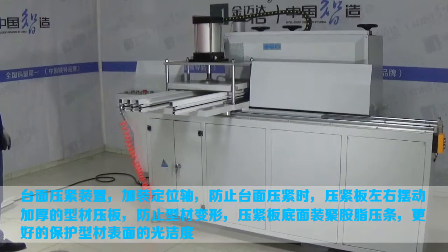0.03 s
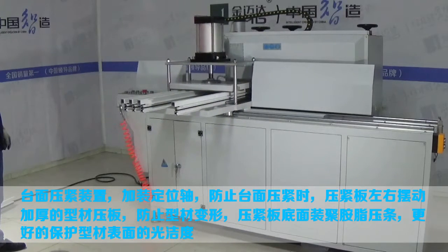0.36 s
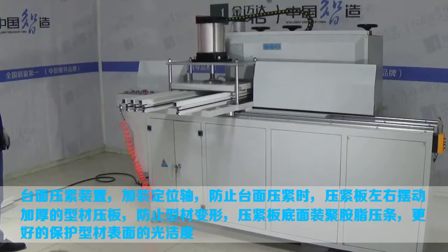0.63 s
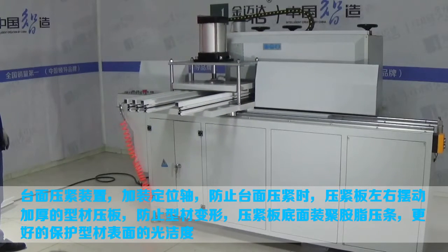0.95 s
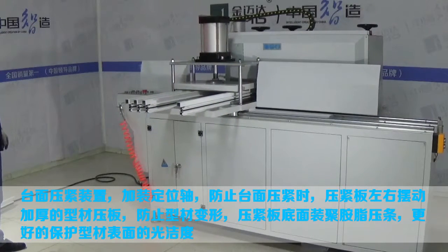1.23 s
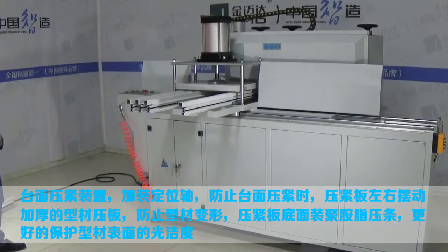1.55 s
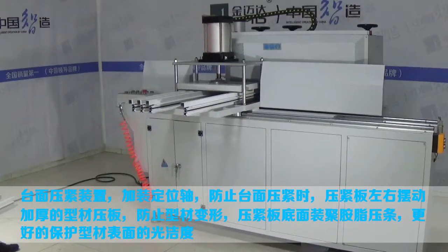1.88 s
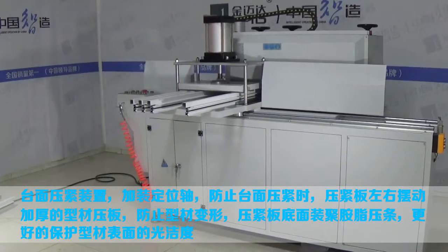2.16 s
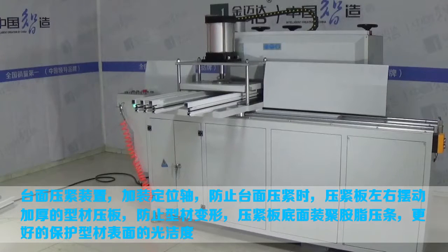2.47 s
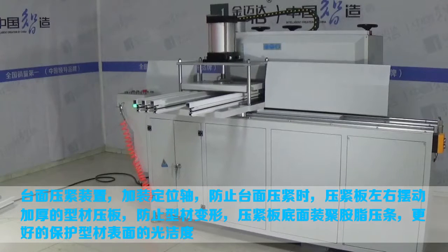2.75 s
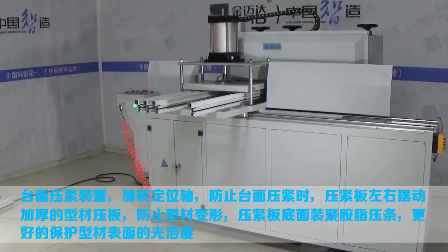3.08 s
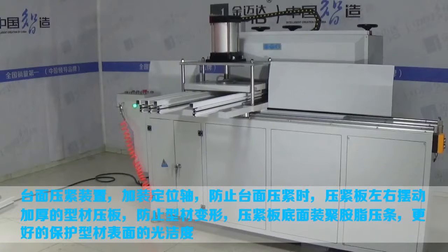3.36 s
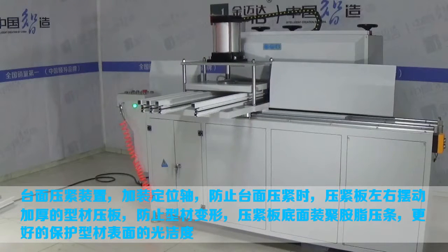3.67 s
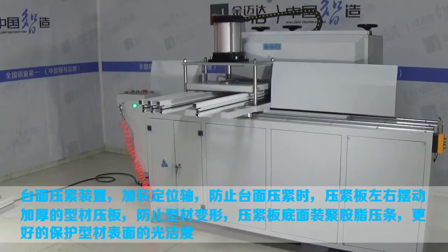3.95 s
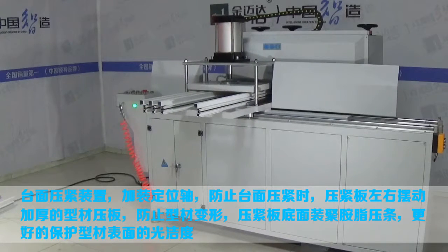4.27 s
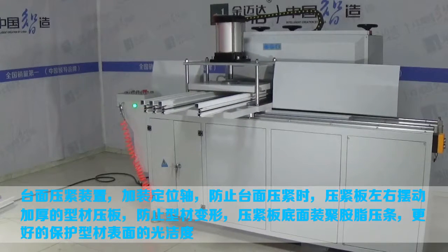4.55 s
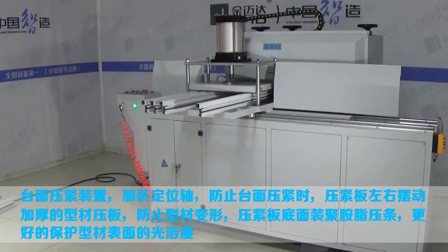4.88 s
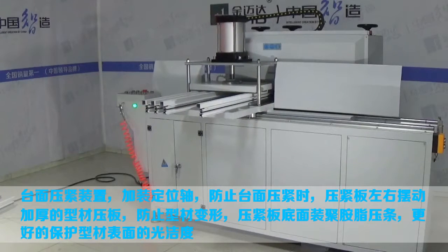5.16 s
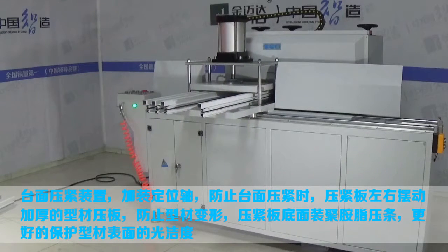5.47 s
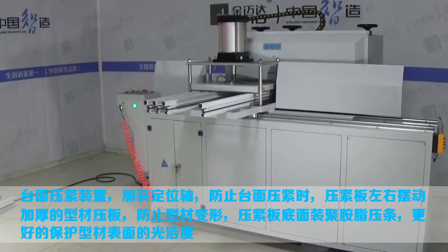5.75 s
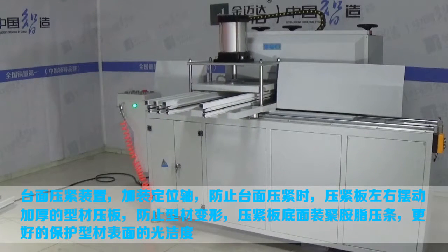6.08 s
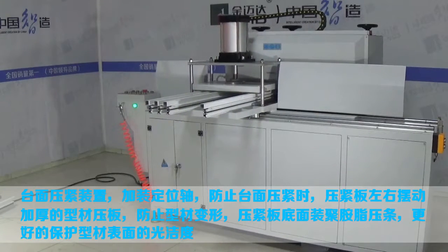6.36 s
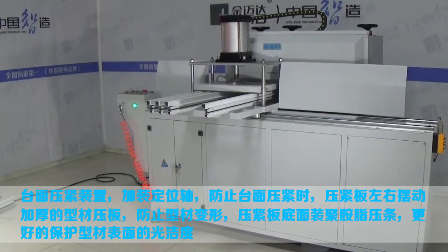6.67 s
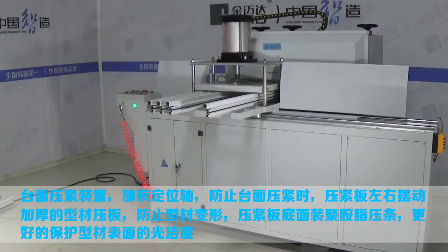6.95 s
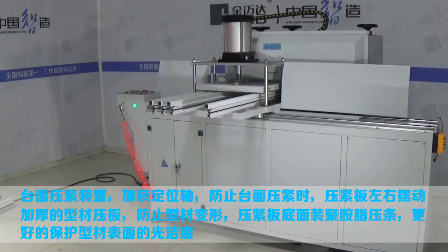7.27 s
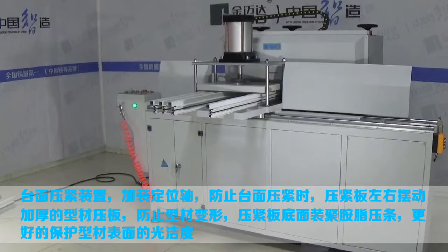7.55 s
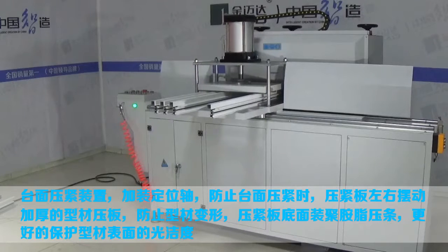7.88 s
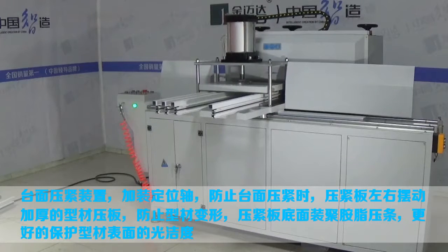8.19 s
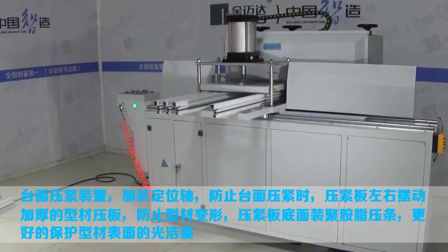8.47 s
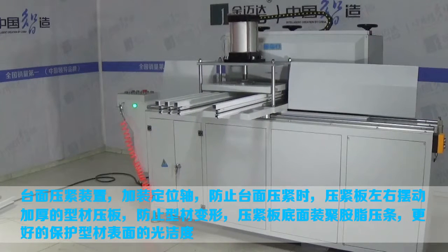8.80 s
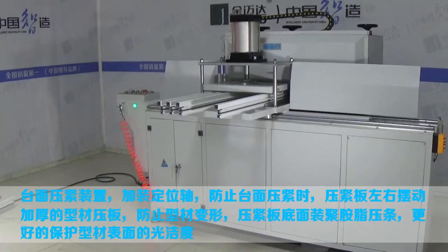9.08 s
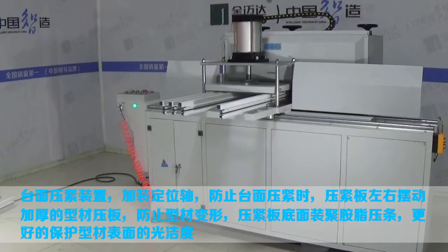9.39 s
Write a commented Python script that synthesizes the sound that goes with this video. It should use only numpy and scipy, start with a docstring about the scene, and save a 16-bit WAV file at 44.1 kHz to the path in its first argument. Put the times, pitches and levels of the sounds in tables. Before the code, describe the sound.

A milling machine runs with a steady airy rush and motor hum while its cutters lightly brush aluminium, giving a thin hiss and high ringing. After about three seconds the cutters bite one after another, with a loud whine that sags in pitch and recovers. The metal squeals and buzzes amid hissing chips, then the cut eases into a rubbing hiss. The stereo sound carries short echoes from hard workshop walls.

```python
"""Saw-toothed cutters of an end-milling machine bite aluminium profiles in a hard-walled workshop.
They skim the profiles on the return stroke and idle, then bite one after another: each whines at its
tooth rate, sags under load and recovers, while the metal sings and buzzes in a hiss of chips.
A closely spaced microphone pair hears them directly and off the walls; the camera's gain control
ducks the motor hum when the cut gets loud."""
import sys
import numpy as np
from scipy import signal
from scipy.fft import rfft, irfft, next_fast_len
from scipy.io import wavfile
from scipy.ndimage import uniform_filter1d, map_coordinates

SR = 44100
rng = np.random.default_rng(int(sys.argv[2]) if len(sys.argv) > 2 else 0)


def store_pcm(level_fs):
    """Save levels as 16-bit WAV."""
    pcm = np.round(np.clip(level_fs, -1, 1) * 32767).astype(np.int16)
    wavfile.write(sys.argv[1], SR, np.atleast_2d(pcm).T)


N = 420273
TIME = np.arange(N) / SR
TEETH, IDLE_HZ, FULL_SAG_HZ = 40, 2000, 70  # per cutter; free tooth rate; its drop in a full cut

# harmonics of the tooth rate, from the first up: level/dB
TOOTH_HARMONICS = [-8, -11, -9, -6, -5]
# load on each cutter: t/s, drop of the tooth rate/Hz
CUTTER_LOAD = { "first": [(3.14, 0), (3.4, 32), (3.95, 66), (4.3, 52), (5.4, 65), (6, 81), (6.7, 68),
               (7.3, 35), (8.6, 1)], "second": [(3.79, 0), (4.05, 35), (4.5, 69), (5.15, 77), (6.8, 42),
               (7.3, 85), (7.75, 140), (8.3, 106), (9, 34), (9.53, 2)], "third": [(4.5, 0), (5.3, 15),
               (6, 31), (7.4, 15), (8.4, 0)]}
# each cutter's pass: bite t/s, clear t/s, fade/s, whine/dB, extra whine/(dB per Hz of sag), chips/dB
CUTTER_PASSES = {"first": (3.14, 9.3, 1.6, -14, .095, 0), "second": (3.76, 10.6, 6.4, -13.5, .055, -15),
                 "third": (4.5, 8.5, 2.4, -17, .29, 6)}


def amp(db):
    """Decibels to gain."""
    return 10 ** (np.asarray(db) / 20)


def unit(x):
    """Scale to rms 1."""
    return x / np.sqrt(np.mean(np.abs(x) ** 2) + 1e-20)


def along(points, hz):
    """Read (f/Hz, value) points on a log axis."""
    f, values = np.transpose(points)
    return np.interp(np.log(hz + 1), np.log(f + 1), values)


def wobble(rate):
    """A smooth random curve, rate knots a second."""
    steps = np.arange(0, N + 16, 16)
    knots = rng.standard_normal(int(N * rate / SR) + 4)
    return np.interp(np.arange(N), steps, map_coordinates(knots, [steps * rate / SR], mode="nearest"))


def filtered(x, response):
    """Shape x by a gain that depends on frequency."""
    size = next_fast_len(N + SR // 4)
    return irfft(rfft(x, size) * response(np.fft.rfftfreq(size, 1 / SR)), size)[..., :N]


def gate(start, end, rise, fall):
    """Attack, hold, release."""
    return np.clip(np.minimum((TIME - start) / rise, (end - TIME) / fall), 0, 1)


def arch(centre, length):
    """A half-cosine swell."""
    return np.cos(np.pi * np.clip((TIME - centre) / length, -.5, .5))


def shaken_tone(phase, flutter):
    """A tone of rms near 1 with irregular strength and phase."""
    return np.sqrt(2) * (1 + flutter * wobble(60)) * np.sin(phase + flutter * wobble(90))


def tones(partials, waver_db, drift):
    """Steady pitches, each wavering in strength and phase."""
    return np.sqrt(2) * sum(
        amp(db + waver_db * wobble(6)) * np.sin(2 * np.pi * hz * TIME + drift * wobble(9))
        for hz, db in partials)


def rush(spectrum, ripple_db):
    """Two noises of rms 1, rippled by the many narrow resonances of the metal."""
    def response(hz):
        ripple = np.interp(hz, np.arange(0, 12000, 30), rng.standard_normal(400))
        return amp(along(spectrum, hz) + ripple_db * ripple * hz / (hz + 1000))
    return unit(filtered(rng.standard_normal((2, N)), response))


def buzz(bands):
    """Noise in the narrow bands of the metal."""
    def response(f):
        return sum(amp(db) * unit(1 / (1 + (2 * (f - hz) / width) ** 4)) for hz, width, db in bands)
    return filtered(rng.standard_normal(N), response)


def diffuse_field(pair):
    """Two unrelated signals arrive from all round at the closely spaced microphones."""
    likeness = [(50, 0.87), (200, .92), (500, 0.86), (1000, 0.7), (2000, 0.8), (4000, 0.81), (9000, 0.92)]  # f/Hz, left-right correlation
    def response(hz):
        turn = np.arccos(np.clip(along(likeness, hz), -1, 1)) / 2
        return np.array([np.cos(turn), np.sin(turn)])
    mid, side = filtered(pair, response)
    return np.array([mid + side, mid - side])


def workshop(x):
    """Two unrelated answers of the hard walls, the treble dying first."""
    decay = [(200, 1), (2000, 0.61), (10000, 0.57)]  # reverberation: f/Hz, t60/s
    hz, t, noise = signal.stft(rng.standard_normal((2, SR * 3 // 4)), SR, nperseg=256)
    tail = signal.istft(noise * amp(-60 * t / along(decay, hz)[:, None]), SR, nperseg=256)[1]
    delayed = np.pad(x, (300, 0))[None]
    return signal.fftconvolve(delayed, tail / np.linalg.norm(tail[0]), axes=1)[:, :N]


def spindle_air():
    """The steady rush of the spindles fills the room."""
    spectrum = [(15, -43), (25, -19), (48, -19), (124, -13.5), (217, -6.5), (442, -11), (998, -2),
                (1930, -8.5), (2140, -6), (2900, -6), (3840, -10.5), (5080, -12.5), (5770, -13),
                (6390, -13), (10900, -10), (14200, -45), (22000, -120)]  # noise density: f/Hz, level/dB
    return amp(-25) * rush(spectrum, ripple_db=5.5)


def motor_hum():
    """Motors and fans hum, centred between the microphones."""
    partials = [(49.9, -54), (99.8, -59.5), (220.5, -43), (269.5, -47.5), (899, -51), (1007, -41),
                (2945, -49), (4032, -44), (4447, -49)]  # f/Hz, level/dB
    return tones(partials, waver_db=.5, drift=.2)


def feed_drive():
    """The table drive holds one low note on each stretch of its travel."""
    notes = [(4.12, 4.65, 168, -37), (4.6, 6.08, 194, -37.5), (6.03, 9.3, 129, -41.5), (7.7, 8.5, 172, -41)]  # start t/s, end t/s, f/Hz, level/dB
    return sum(amp(db + 2 * wobble(7)) * gate(start, end, .06, .06)
               * shaken_tone(2 * np.pi * hz * TIME, flutter=.25) for start, end, hz, db in notes)


def sag(cutter):
    """How far the load pulls a cutter's tooth rate down, in Hz."""
    return np.abs(np.interp(TIME, *np.transpose(CUTTER_LOAD[cutter])))


def labour(cutter):
    """0 for a free cutter, near 1 when it labours and shakes the profile."""
    return np.tanh((sag(cutter) / FULL_SAG_HZ) ** 2)


def shaft_angle(cutter):
    """A cutter's shaft turns, slowed by the load and trembling in speed."""
    return 2 * np.pi * np.cumsum(IDLE_HZ - sag(cutter) + .72 * wobble(25)) / TEETH / SR


def whine_strength(cutter):
    """A cutter whines from its bite until it clears, louder under load."""
    bite, clear, fade, db, db_per_hz, _ = CUTTER_PASSES[cutter]
    return gate(bite, clear, rise=.045, fall=fade) * amp(db + db_per_hz * sag(cutter))


def rubbing():
    """Teeth brush the cut face: the strength of the hiss, whine and blade ringing they excite."""
    rubs = [(-.1, .16, .05, .14, -19.5, -12.5, -40), (-.1, 2.3, .05, 1.1, -19.5, -24, -38),
            (.44, 1.55, .06, .5, -13.5, -36, -33), (.9, 1.86, .45, .14, -19.5, -36, -26),
            (4.15, 4.8, .2, .35, -5.5, -40, -60), (8.12, 9.9, .8, .2, -4, -20, -29),
            (9.36, 9.9, .17, .2, -14, -7, -25)]  # start t/s, end t/s, rise/s, fall/s, hiss/dB, whine/dB, ringing/dB
    return np.sqrt(sum((amp(levels)[:, None] * gate(start, end, rise, fall)) ** 2
                       for start, end, rise, fall, *levels in rubs))


def blade_ring(strength):
    """The brushed blades ring at their own pitches."""
    modes = [(3047, -13), (3496, -3), (4296, 1), (4861, -14), (5491, -6.5), (6568, -33), (8436, -34),
             (9141, -27), (9609, -9.5), (10438, -7.5)]  # f/Hz, level/dB
    return strength * tones(modes, waver_db=3.5, drift=.55)


def growl(angle):
    """The 16th multiple of the second shaft sounds when that cutter labours."""
    return amp(-30.5) * labour("second") * shaken_tone(16 * angle, flutter=.25)


def groans(angle):
    """The profile's wall flaps at a cluster of low shaft multiples."""
    clusters = [(3.62, -19, .38, 22, .4), (3.55, -29, .5, 22, 4), (4.35, -22, .5, 27, 3.5)]  # centre t/s, level/dB, length/s, middle multiple, spread/multiples
    out = np.zeros(N)
    for centre, db, length, middle, spread in clusters:
        for step in range(-3, 4):
            swell = amp(db) * arch(centre, length) / np.hypot(1, 2 * step / spread)
            phase = (round(middle) + step) * angle + 2 * np.pi * rng.random()
            out += swell * shaken_tone(phase, flutter=.2)
    return out


def chatter():
    """Thin walls of the profile buzz, their pitch sliding as the cut moves on."""
    bursts = [(3.5, 3.85, 920, -47, 460, -33), (4.17, 4.32, 3610, -46, 69, -7),
              (4.15, 4.65, 1280, -150, 400, -21), (4.95, 5.15, 3670, -100, 140, -13),
              (5.2, 5.9, 5225, -9, 107, -18), (5.95, 6.55, 1580, -350, 137, -18),
              (7.1, 7.55, 1570, 2, 38, -20.5), (7.5, 8.0, 1450, -100, 120, -17),
              (7.6, 7.97, 7080, 0, 140, -18), (5.02, 5.12, 6830, 0, 40, -12)]  # start t/s, end t/s, centre f/Hz, slide/Hz, width/Hz, level/dB
    out = np.zeros(N)
    for start, end, hz, slide, width, db in bursts:
        span = np.flatnonzero((TIME > start) & (TIME < end))
        progress = np.linspace(0, 1, len(span))
        offset_hz = np.fft.fftfreq(next_fast_len(len(span)), 1 / SR)
        band = np.exp(2j * np.pi * rng.random(len(offset_hz))) / (1 + (2 * offset_hz / width) ** 4)
        shake = np.fft.ifft(band)[:len(span)]
        phase = 2 * np.pi * np.cumsum(hz + slide * (progress - .5)) / SR
        swell = amp(db) * np.sqrt(np.abs(np.sin(np.pi * progress)))
        out[span] += swell * unit((shake * np.exp(1j * phase)).real)
    return out


def metal_buzz(rub):
    """The metal buzzes under each cutter's load and when the teeth brush it."""
    loaded = {"first": [(6820, 110, -23), (10710, 257, -21)], "second": [(1830, 240, -20)],
              "third": [(1920, 330, -5), (3820, 440, -7.5)]}  # per cutter: f/Hz, width/Hz, level/dB at full labour
    brushed = [(1990, 170, -11.5), (3020, 120, -21), (3400, 100, -21), (4900, 120, -17), (6358, 50, -18),
               (7700, 900, -17), (10100, 1700, -9)]  # f/Hz, width/Hz, level/dB relative to the rub
    return sum(labour(cutter) * buzz(loaded[cutter]) for cutter in loaded) + rub * buzz(brushed)


def chips(rub):
    """Tearing metal rasps, and hisses when the cut is deep; teeth that only rub mostly hiss."""
    rasp_spectrum = [(30, -55), (100, -12), (300, -9.5), (500, -14.5), (750, 0.5), (1100, -4), (1700, -1.5),
                     (2300, -4.5), (2800, -1.5), (3600, 1.5), (5000, 1.5), (8000, -6.5), (11000, -23)]  # noise density: f/Hz, level/dB
    hiss_spectrum = [(100, -60), (2000, -35), (4000, -14.5), (6000, 2), (8000, -1.5), (10000, 3.5),
                     (11000, 1)]  # noise density: f/Hz, level/dB
    flow = np.sqrt(sum((amp(chips_db) * (sag(cutter) / FULL_SAG_HZ) ** 1.3) ** 2
                       for cutter, (*_, chips_db) in CUTTER_PASSES.items()))
    spray = amp(.5 * wobble(12) + 1.33 * wobble(110))
    rasp = np.hypot(amp(-15) * flow, amp(-9) * rub) * rush(rasp_spectrum, ripple_db=4)
    hiss = np.hypot(amp(-11) * flow ** 1.5, amp(-2) * rub) * rush(hiss_spectrum, ripple_db=7)
    return spray * (rasp + hiss)


def singing(cutter, strength, angle, width_hz=40, runout=.12):
    """Tooth harmonics swell as they slide through the profile's resonances; the first cutter squeals."""
    resonances = {"first": [(1945, -2), (3865, -9), (3995, -5), (5835, -1.5), (5960, -3), (7690, 1.5),
                  (7790, -1), (7990, -4), (9665, 1), (9840, -4)], "second": [(5595, 4), (5665, 4.5),
                  (5778, 2), (7690, 1), (9615, 2)], "third": [(5955, 3)]}  # per cutter: f/Hz, level/dB relative to its whine strength
    squeals = [(.02, -15, .2, 4), (.03, -19, .2, 2), (.86, -25, .3, 2), (1.52, -19, .46, 2),
               (3.3, -13, .25, 2), (3.58, -10.5, .4, 2), (3.98, -2, .37, 2), (4.15, -.5, .19, 2),
               (4.35, -8, .45, 2), (6.09, -7, .5, 4), (6.46, -15, .27, 2), (6.99, -15, .3, 2),
               (9.5, -12, .22, 4)]  # centre t/s, level/dB, length/s, tooth harmonic
    tooth_hz = IDLE_HZ - sag(cutter)
    swells = {}
    for hz, db in resonances[cutter]:
        k = round(hz / IDLE_HZ)
        detuning = 2 * (k * tooth_hz - hz) / width_hz
        swells[k] = swells.get(k, 0) + strength * amp(db) / (1 + detuning ** 2)
    if cutter == "first":
        for centre, db, length, k in squeals:
            swells[round(k)] = swells.get(round(k), 0) + amp(db) * arch(centre, length)
    # the cutter runs slightly out of true, so the tone rasps once and twice a turn
    rasp = 1 + runout * (np.cos(angle + wobble(4)) + np.cos(2 * angle + wobble(4)))
    return rasp * sum(swell * amp(2 * wobble(26)) * shaken_tone(k * TEETH * angle + np.pi / 2, .2)
                      for k, swell in swells.items())


def uneven_teeth(angle, skirt=4.2, lower_boost_db=4):
    """No two teeth cut alike: a pattern repeating each turn puts sidebands round each tooth harmonic."""
    multiples = np.arange(2048)
    weight = np.zeros(len(multiples))
    for k, db in enumerate(TOOTH_HARMONICS, 1):
        offset = multiples - k * TEETH
        weight += amp(db + lower_boost_db * (offset < 0)) * (offset != 0) / (1 + (offset / skirt) ** 2)
    turn = unit(irfft(weight * np.exp(2j * np.pi * rng.random(len(weight))), 8 * len(weight)))
    return np.interp(angle / (2 * np.pi) % 1 * len(turn), np.arange(len(turn)), turn)


def whine(cutter, strength, angle):
    """Teeth strike the profile, shaken as chips tear off; a deep cut brings out their unevenness."""
    teeth = sum(amp(db + 2.2 * wobble(10)) * shaken_tone(k * TEETH * angle, flutter=.23)
                for k, db in enumerate(TOOTH_HARMONICS, 1))
    sidebands = (.5 + labour(cutter)) * amp(-5 + 3.2 * wobble(40)) * uneven_teeth(angle)
    return strength * (teeth + sidebands)


def scene():
    """At the microphones: cutters, ringing metal and chips over the rush and hum of the spindles."""
    balance = [(100, -0.5), (500, -0.5), (1000, -1.6), (2000, -1.5), (4000, -1.5), (9000, -.8)]  # f/Hz, left over right level/dB
    rub, rub_whine, rub_ring = rubbing()
    angles = {cutter: shaft_angle(cutter) for cutter in CUTTER_LOAD}
    strength = {cutter: whine_strength(cutter) for cutter in CUTTER_LOAD}
    strength["first"] = np.hypot(strength["first"], rub_whine)
    cut = sum(whine(cutter, strength[cutter], angles[cutter]) for cutter in CUTTER_LOAD)
    cut += chatter() + metal_buzz(rub)
    ring = sum(singing(cutter, strength[cutter], angles[cutter]) for cutter in CUTTER_LOAD)
    ring += growl(angles["second"]) + groans(angles["first"]) + blade_ring(rub_ring)
    air = spindle_air()
    # the cutters are heard directly with strong wall echoes, the ringing metal with weaker ones
    echoes = amp([[-6], [3]]) * workshop(cut + amp(-4.5) * ring)  # mid, side
    direct = amp(-2) * cut + ring + motor_hum() + feed_drive()
    stereo = direct + diffuse_field(echoes + chips(rub) + air)
    return filtered(stereo, lambda hz: amp(np.array([[.5], [-.5]]) * along(balance, hz)))


def gain_control(x, ceiling_db=-16.3, release_db_per_s=5, start_duck_db=9):
    """Loud sound pulls the gain down at once; it creeps back slowly."""
    power = uniform_filter1d(np.mean(x ** 2, axis=0), size=1500)
    excess_db = np.maximum(10 * np.log10(np.abs(power) + 1e-12) - ceiling_db, 0)
    release_db = release_db_per_s * TIME
    duck_db = np.maximum.accumulate(np.maximum(excess_db + release_db, start_duck_db)) - release_db
    return x * amp(-uniform_filter1d(duck_db, size=400))


def record(dry):
    """The camera rides its gain and keeps nothing above 11.1 kHz."""
    return filtered(gain_control(dry), lambda hz: hz < 11100)


dry = scene()
out = record(dry)
store_pcm(out)
```